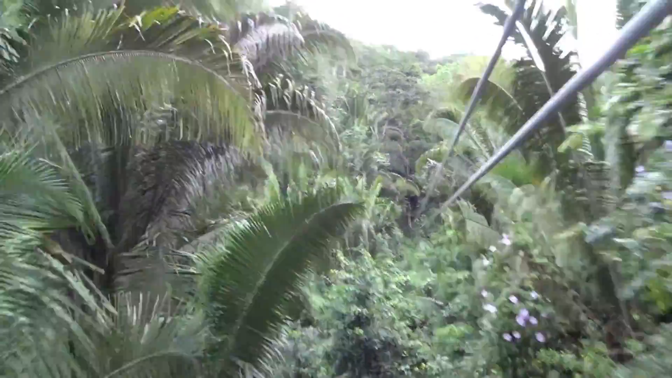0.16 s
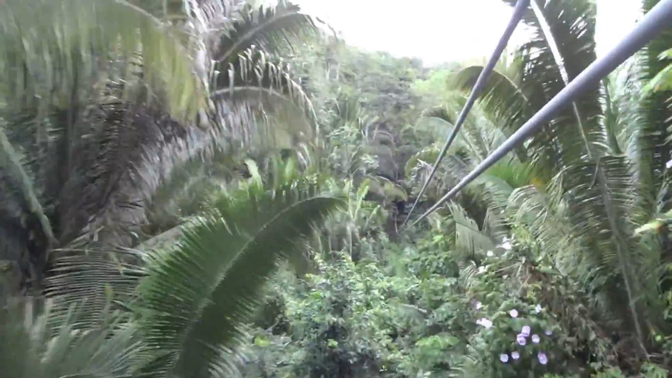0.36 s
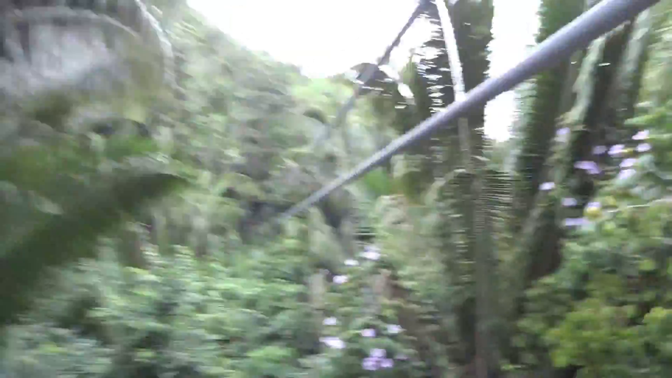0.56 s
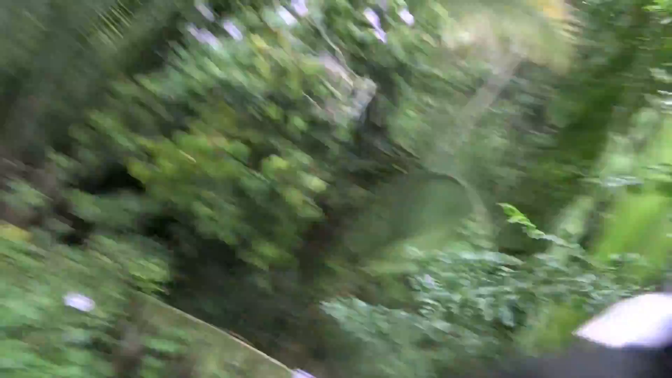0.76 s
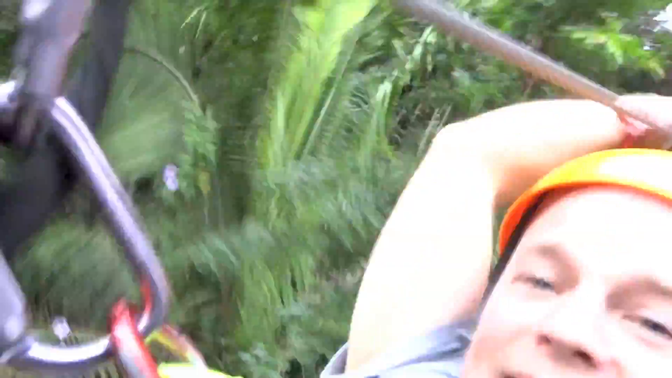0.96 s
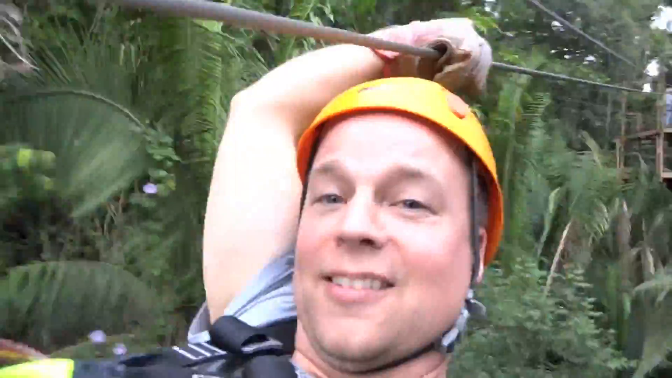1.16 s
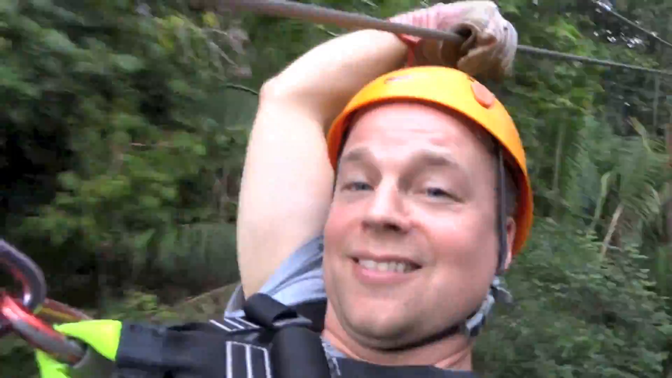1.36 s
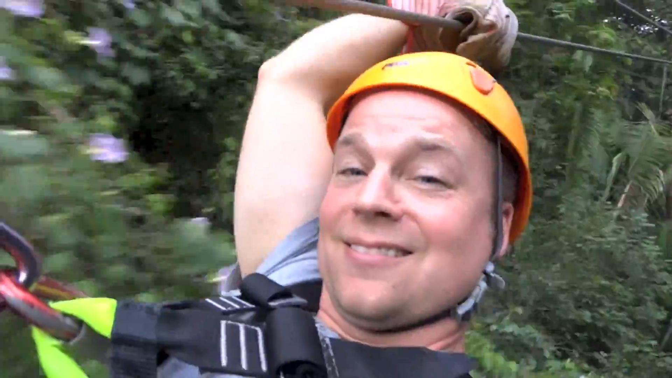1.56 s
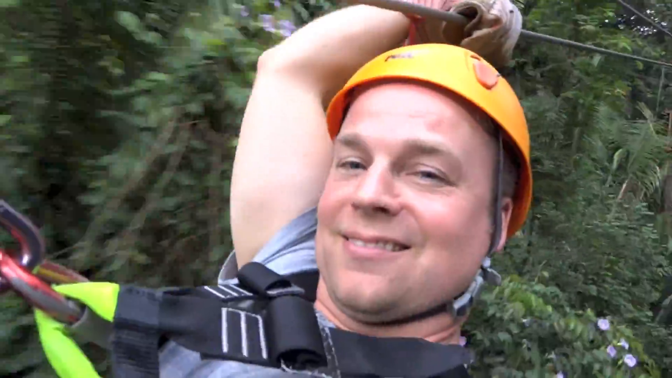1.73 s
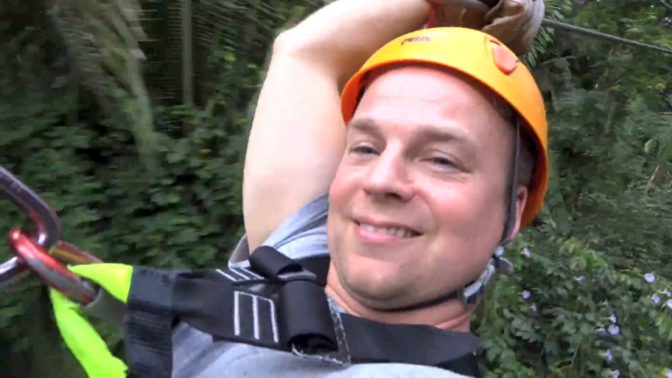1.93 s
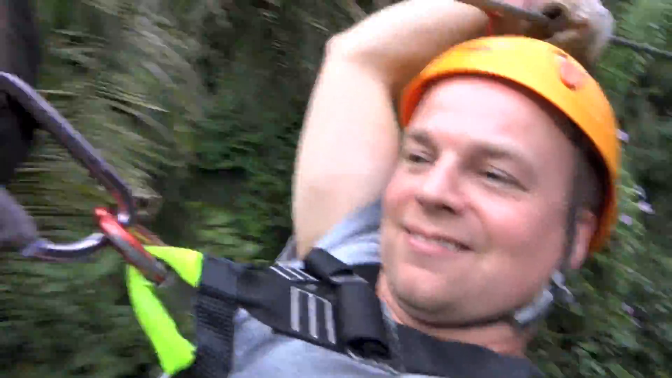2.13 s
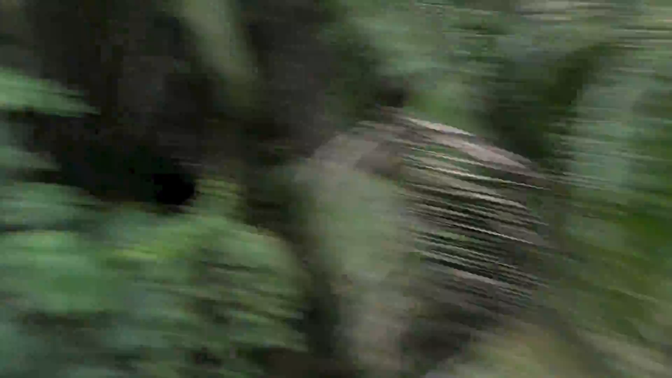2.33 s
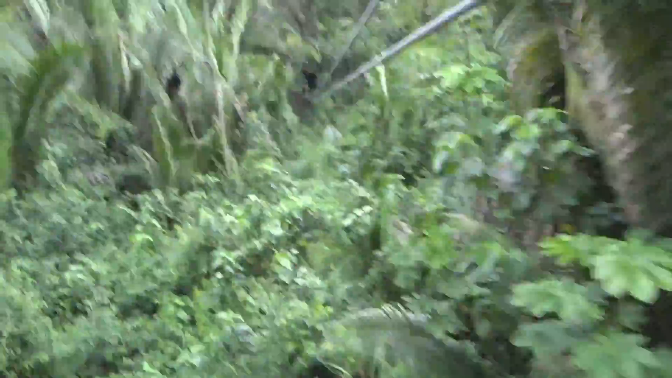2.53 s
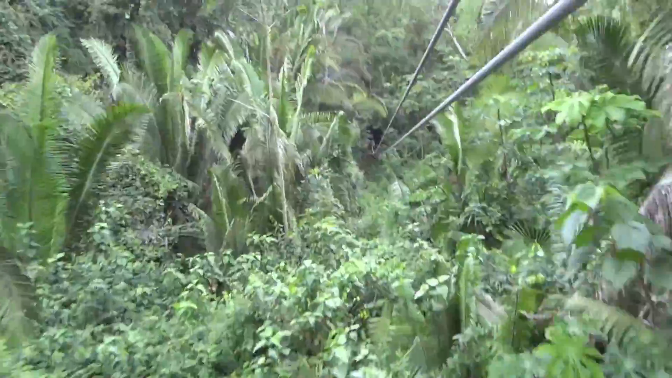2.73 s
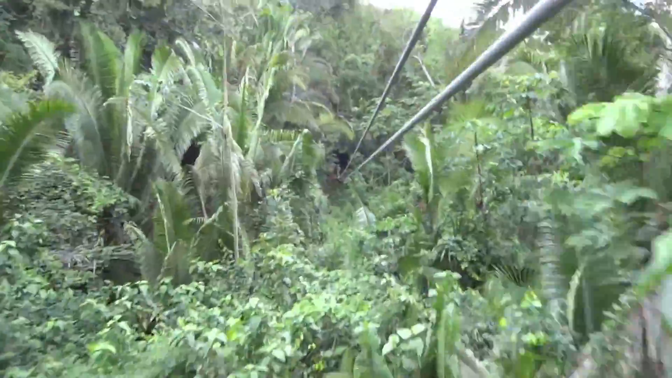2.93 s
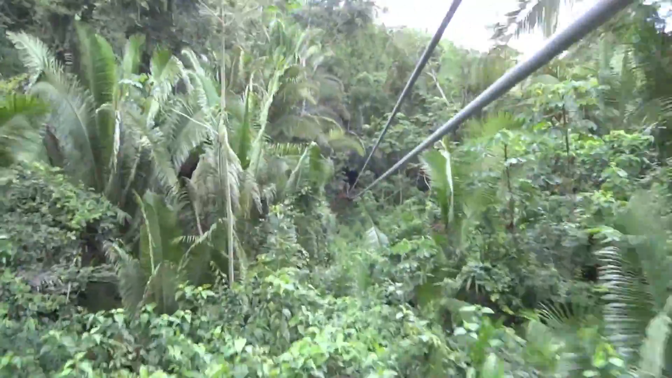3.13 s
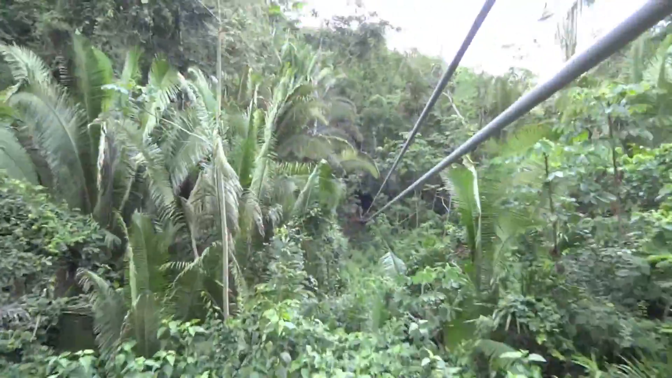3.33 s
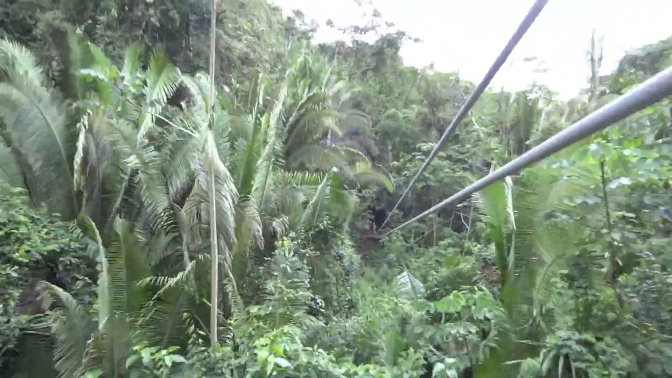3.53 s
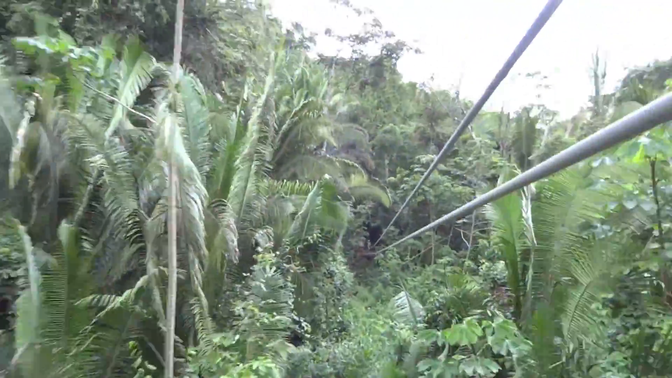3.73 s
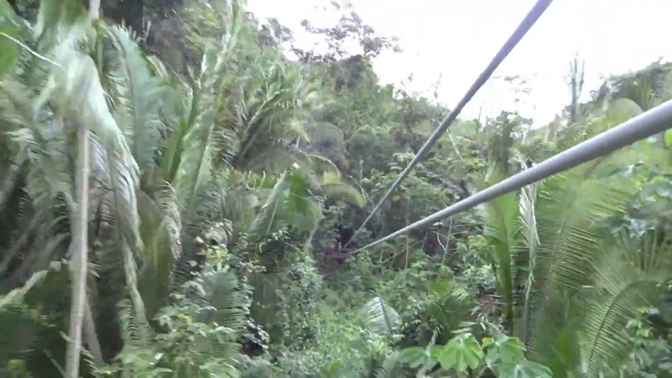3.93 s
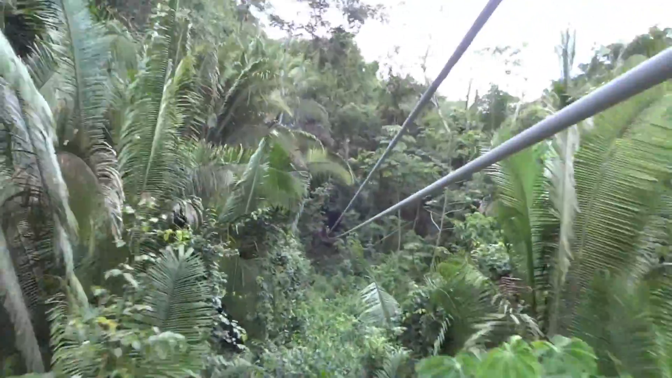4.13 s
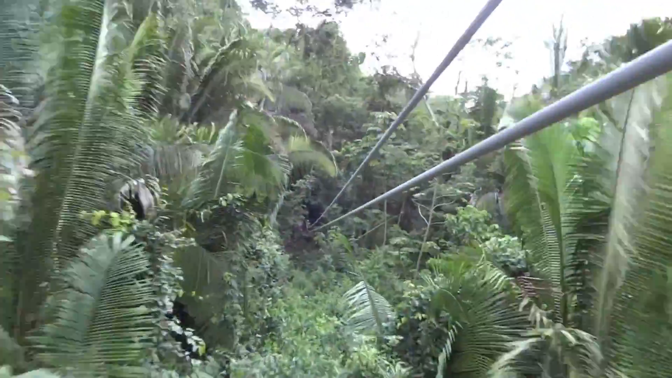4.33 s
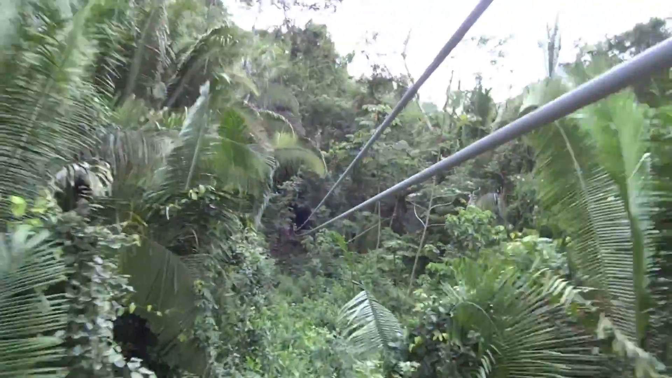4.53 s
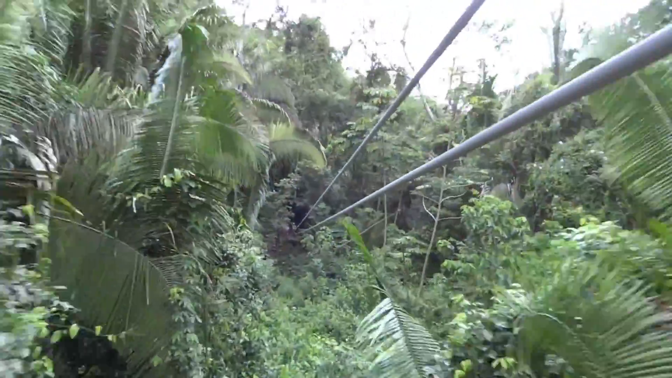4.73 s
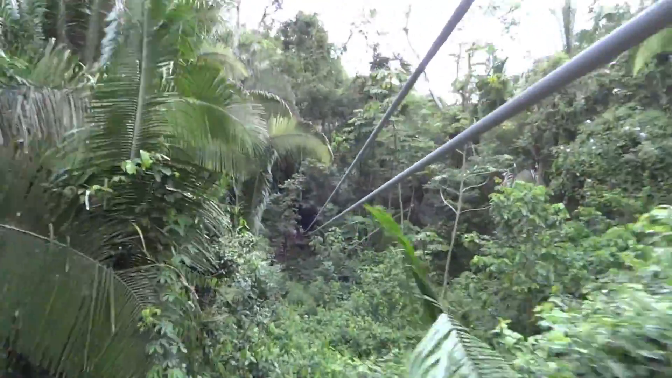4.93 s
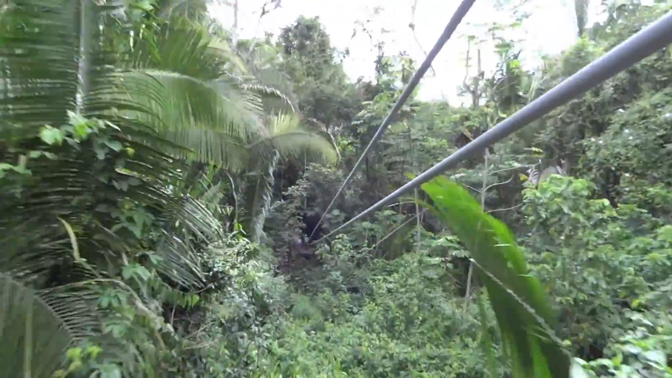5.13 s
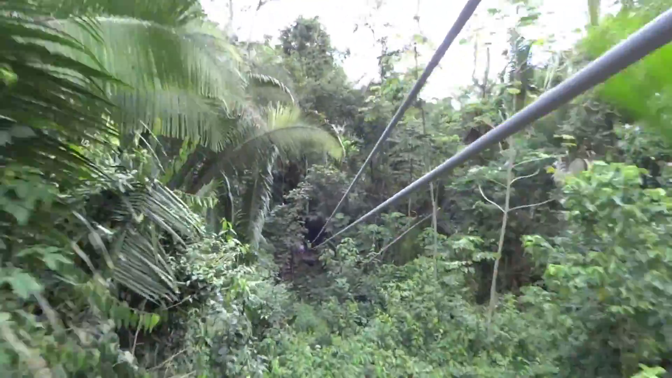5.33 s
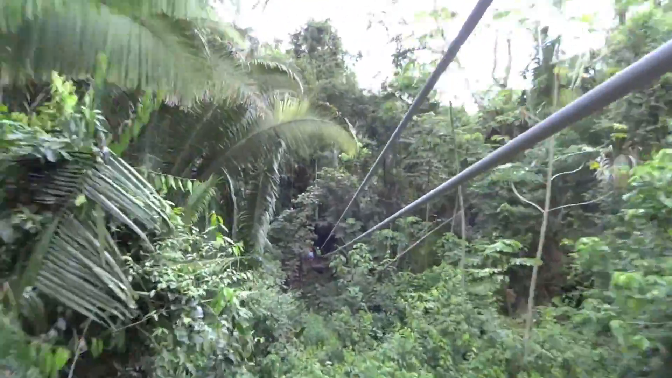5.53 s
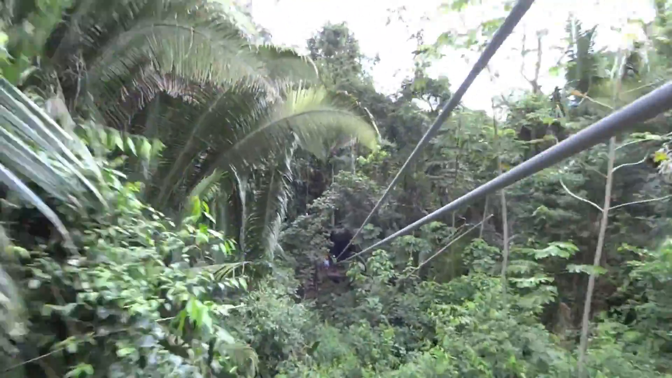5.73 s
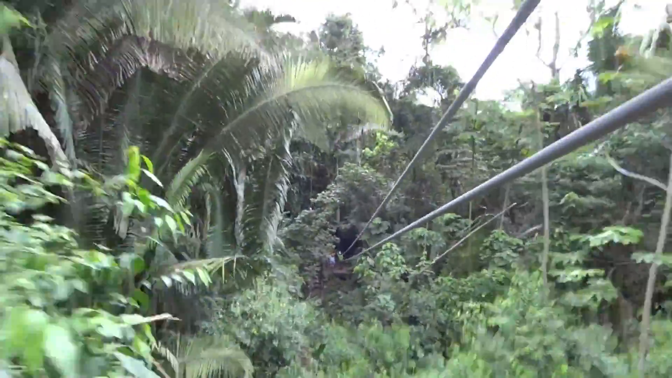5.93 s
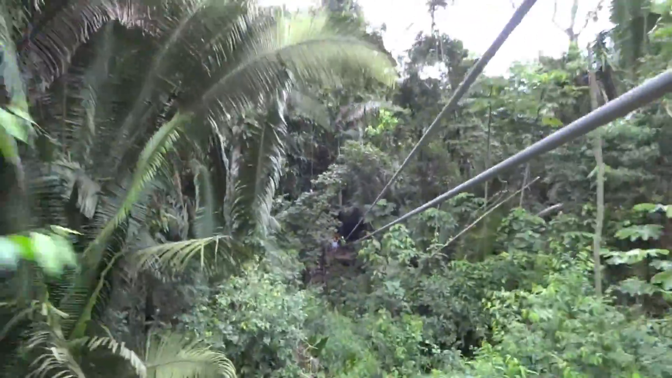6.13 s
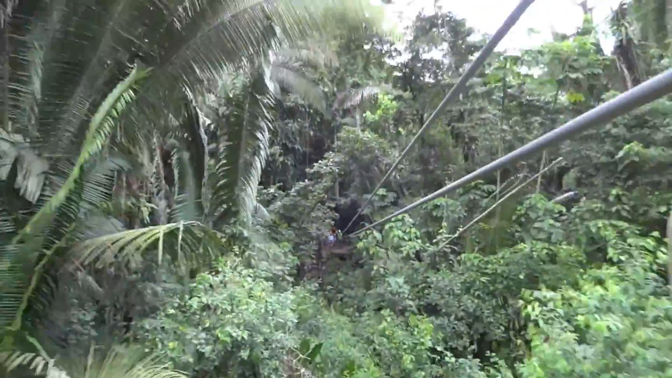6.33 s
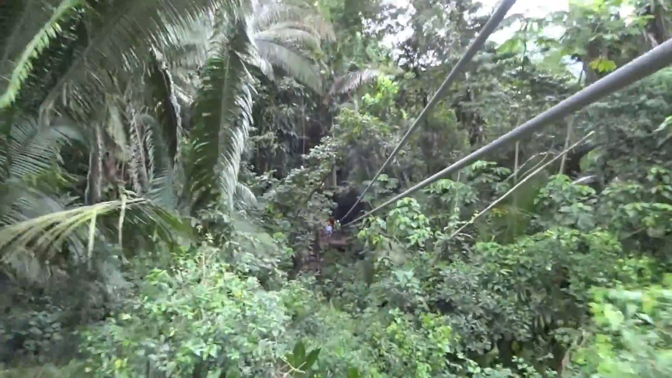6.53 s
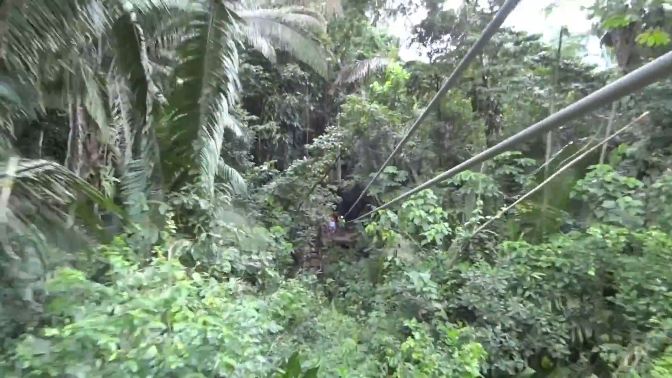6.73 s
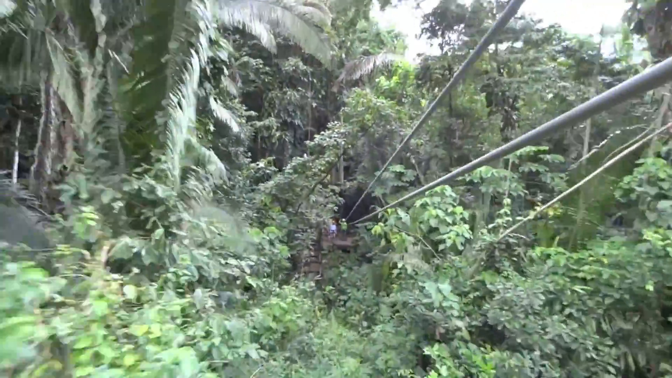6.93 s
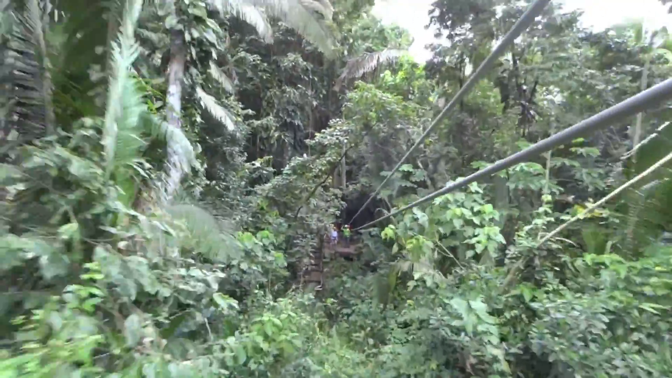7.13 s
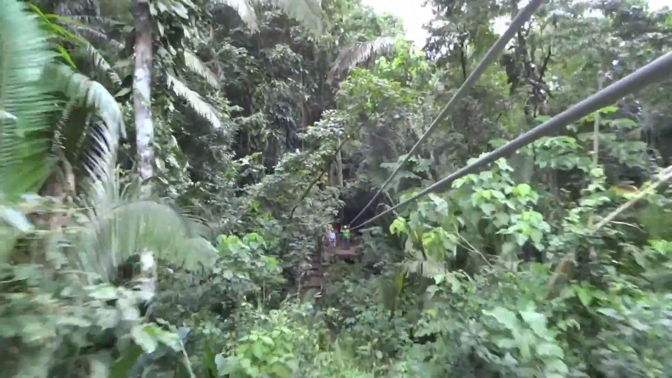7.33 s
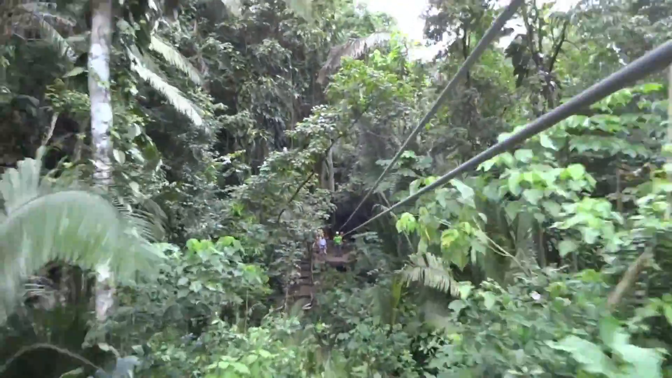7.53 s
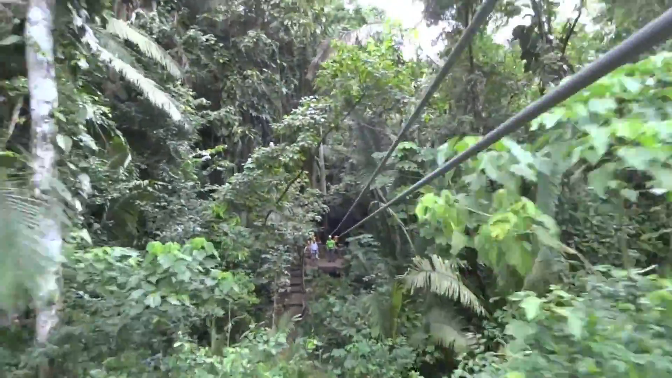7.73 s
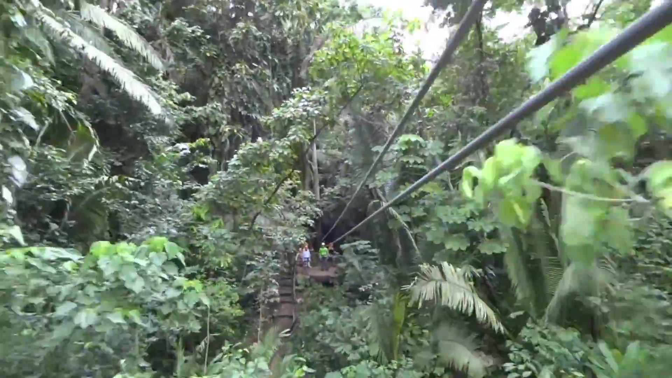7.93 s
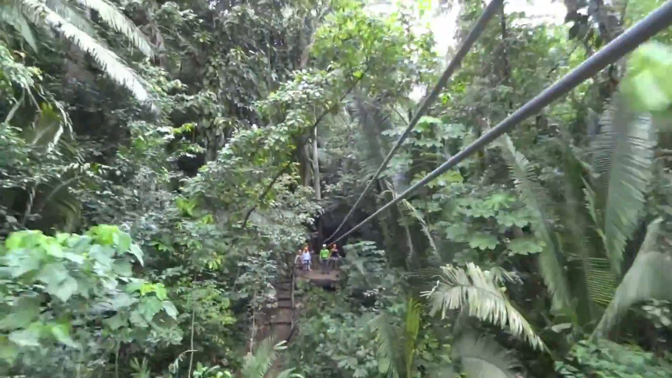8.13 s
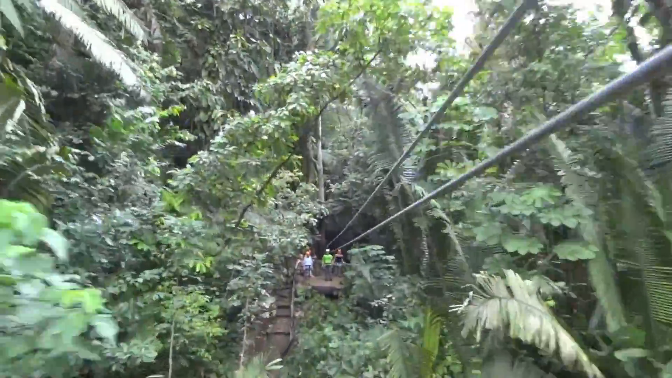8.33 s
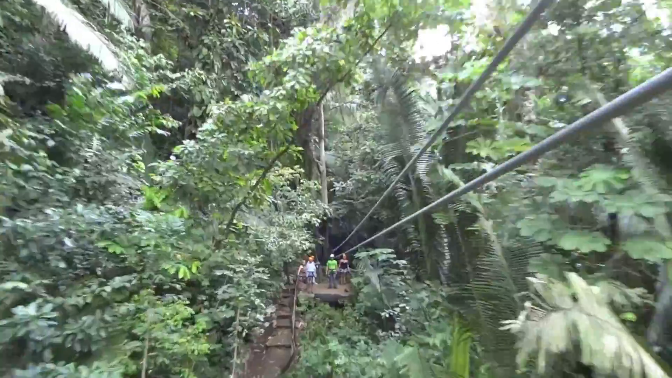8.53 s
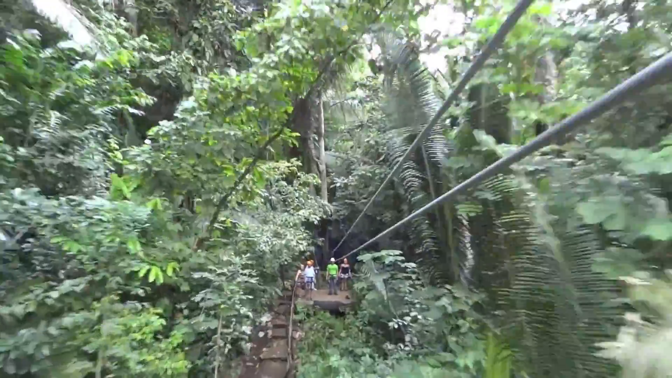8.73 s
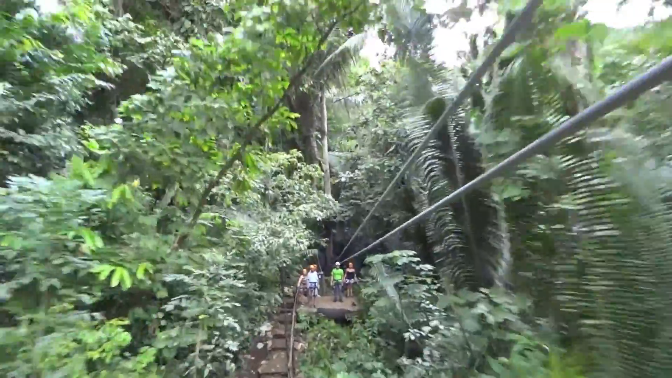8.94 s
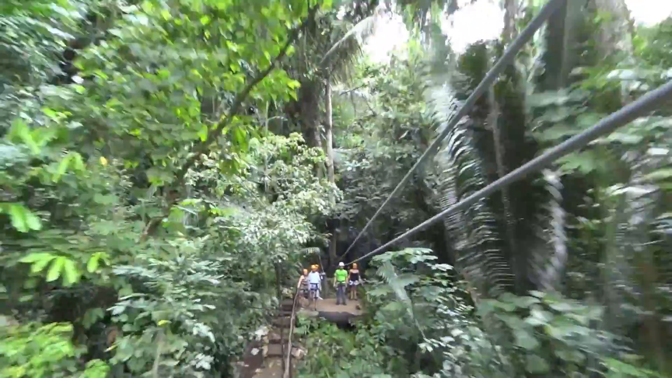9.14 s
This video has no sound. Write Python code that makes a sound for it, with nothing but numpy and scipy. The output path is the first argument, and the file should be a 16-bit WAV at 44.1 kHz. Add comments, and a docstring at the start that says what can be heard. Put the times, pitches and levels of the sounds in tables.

```python
"""A zip-line trolley runs along a steel cable through the forest, the microphone riding just below it.
Its whirr is a smeared tone: the twisted strands pass under the pulleys at an unsteady rate.
One pulley mode sings at a fixed high note, made by letting noise ring in a narrow band.
The contact hisses as grainy filtered noise. Wind buffets and rushes as low, wide filtered noise,
and drops while the microphone is turned back into the lee."""
import sys
import numpy as np
from scipy.fft import rfft, irfft, next_fast_len
from scipy.io import wavfile
from scipy.ndimage import uniform_filter1d

SR = 44100
rng = np.random.default_rng(int(sys.argv[2]) if len(sys.argv) > 2 else 0)


def int16_out(signal):
    """Quantize to a 16-bit WAV file."""
    q = np.round(np.clip(np.atleast_2d(signal).T, -1, 1) * 32767)
    wavfile.write(sys.argv[1], SR, q.astype(np.int16))


N = 408807
TIME = np.arange(N) / SR   # seconds
SIZE = next_fast_len(N)
BINS = np.maximum(np.arange(SIZE // 2 + 1) * SR / SIZE, 1)   # Hz

# The whirr starts dull, then opens up. Each row: time in seconds, centre of the whirr in Hz.
WHIRR_PITCH = [(0, 2598), (.28, 2700), (.39, 3230), (.47, 2886), (.56, 2460), (.63, 3160), (.68, 3750),
               (.74, 4596), (1.2, 4836), (2.5, 4842), (3.1, 4602), (5, 4672), (9.27, 4585)]
# How hard the pulleys bear on the cable; drives hiss, sizzle and whirr.
# Each row: time in seconds, level change in dB.
CONTACT = [(.75, -3.5), (1.15, 0.7), (2.3, -0.5), (2.8, -3.5), (3.5, -2), (4.1, 1), (4.75, -0.7),
           (5.75, 2.5), (6.15, -0.4), (6.85, -0.5), (7.3, -2), (7.95, 0.5), (8.3, -2), (9.27, -2)]
NOTE_HZ = 3682   # the pulley mode that sings


def from_db(db):
    """Turn decibels into gain."""
    return 10 ** (np.asarray(db) / 20)


def rms_one(x):
    """Scale a signal to unit power."""
    return x / np.sqrt(np.mean(x ** 2) + 1e-20)


def in_time(rows):
    """Draw each column of a table as a curve over all samples."""
    seconds, *columns = np.transpose(rows)
    return [np.interp(TIME, seconds, column) for column in columns]


def over_hz(points):
    """Draw a table of frequencies as a curve over all bins, on a logarithmic pitch scale."""
    hz, value = np.transpose(points)
    return np.interp(np.log(BINS), np.log(hz), value)


def swells(rows):
    """Bell-shaped rises or dips in dB, summed for each level column."""
    return sum(np.outer(db, np.exp(-((TIME - centre) / length) ** 2)) for centre, length, *db in rows)


def drift(rate):
    """A smooth random curve of unit power that changes about rate times a second."""
    spectrum = rfft(rng.standard_normal(SIZE))
    return rms_one(irfft(spectrum / (1 + (BINS / rate) ** 2), SIZE)[:N])


def white():
    """Two unrelated noises."""
    return rng.standard_normal((2, N))


def stereo(pair, colour_db, likeness, pan_db=0, lead=0):
    """Colour two unrelated signals and mix them into left and right; their mean has unit power."""
    mid, side = rfft(pair, SIZE) * from_db(colour_db)
    alike = np.clip(over_hz(likeness), -.995, .995)
    sign = np.array([[1], [-1]])   # left, right
    ears = np.sqrt(1 + alike) * mid + sign * np.sqrt(1 - alike) * side
    ears = ears * from_db(sign * pan_db / 2) * np.exp(.5j * sign * lead)
    out = irfft(ears, SIZE)[:, :N]
    return out / out.mean(axis=0).std()


def from_trolley(pair, colour_db):
    """Place a sound at the trolley, to the left: the sides differ in level and phase."""
    # Each row: frequency in Hz, correlation between left and right (1 is alike).
    likeness = [(1000, 1), (2500, 0.97), (3400, 0.91), (4200, 1), (5200, 0.81), (6200, 0.31), (8000, 0.12),
                (9800, 0.39), (11000, 0.6), (13000, 1)]
    # Each row: frequency in Hz, left minus right in dB.
    pan = [(1500, 1), (3600, 2), (4700, 4), (5700, 8), (6800, 8.5), (8200, 4), (9800, 2.5), (11000, 0)]
    # Each row: frequency in Hz, lead of the left side in radians.
    phase_lead = [(1500, 0.4), (3300, 0.25), (5200, 0.96), (6300, 2), (7300, 2.1), (9000, -2), (9900, 1.5),
                  (10700, -0.2), (13000, 0)]
    return stereo(pair, colour_db, likeness, over_hz(pan), over_hz(phase_lead))


def plate_lifts():
    """The side plates and pulleys resonate and lift some pitches, in dB at every bin."""
    # Resonances. Each row: frequency in Hz, width in Hz, lift in dB.
    plates = [(1916, 53, 3.5), (3270, 34, 6.5), (4785, 150, 3), (5260, 500, 4), (6650, 380, 1.5),
              (9790, 540, 6.5), (11670, 200, 5.5), (12300, 200, 7.5)]
    return sum(db / (1 + (2 * (BINS - hz) / width) ** 2) for hz, width, db in plates)


def turned():
    """How far the microphone has swung round to face the rider and the pulleys, 0-1."""
    # Each row: time in seconds, share of the turn from 0 to 1.
    turn = [(.88, 0.03), (1.26, 0.99), (2.15, 1), (2.37, 0.8), (2.45, 0.25)]
    return in_time(turn)[0]


def dullness():
    """Octaves by which the whirr lies below its open pitch."""
    pitch, = in_time(WHIRR_PITCH)
    open_hz = 4642
    return np.maximum(np.log2(open_hz / pitch), 0)


def strands(spread_hz, steepness, slack, widening):
    """The strands pass under a pulley at a very unsteady rate: a tone smeared into a whirr."""
    pitch, = in_time(WHIRR_PITCH)
    height = pitch / pitch.max()
    spectrum = rfft(white(), SIZE) / np.sqrt(1 + (BINS / spread_hz) ** steepness)
    scatter = rms_one(irfft(spectrum, SIZE)[:, :N])
    # a low whirr reads the scatter more slowly, so it is narrower
    position = np.cumsum(height ** widening)
    a, b = [np.interp(position, np.arange(N), part) for part in scatter]
    # a high whirr is more even in strength
    unsteady = (a + 1j * b) / (slack + a ** 2 + b ** 2) ** (height ** 2 / 2)
    carrier = np.exp(2j * np.pi * np.cumsum(pitch) / SR)
    return np.real(unsteady * carrier)


def whirr():
    """The strands shake the trolley, whose body and plates colour the sound; its strength is evened out."""
    # Broad response of the trolley. Each row: frequency in Hz, response in dB.
    body = [(600, -15), (1400, -4.5), (2200, -2.5), (3000, 1.5), (3600, 0), (4100, -2.5), (4600, -0.5),
            (5250, 1), (5600, -6.5), (6100, -9.5), (7200, -3.5), (8200, -19), (16000, -22)]
    pair = [strands(spread_hz=726, steepness=2.78, slack=0.11, widening=.3) for _ in range(2)]
    sound = from_trolley(pair, over_hz(body) + plate_lifts())
    power = uniform_filter1d(sound.mean(axis=0) ** 2, size=4410)   # over 0.1 s
    return sound / np.sqrt(power)


def singing(width_hz, skirt_hz, evenness):
    """Countless small knocks of the cable keep one pulley mode ringing: a fixed pitch, fluttering in strength."""
    detune = BINS - NOTE_HZ
    peak = 1 + (2 * detune / width_hz) ** 2
    skirt = 1 + (detune / skirt_hz) ** 4
    sound = from_trolley(white(), -10 * np.log10(peak * skirt))
    power = uniform_filter1d(sound.mean(axis=0) ** 2, size=3000)
    return rms_one(sound / power ** (evenness / 2))   # friction reins in the longer swells


def trolley():
    """The whirr follows the contact and yields to the note; both gain when the microphone faces the pulleys."""
    # Level of the singing note, heard facing forward. Each row: time in seconds, level in dB.
    note_level = [(0, -29), (.7, -24.5), (2.5, -25), (3, -30), (3.9, -29.5), (5.2, -26), (6.2, -21.5),
                  (7.2, -23.5), (8.4, -23), (9.27, -22)]
    # The note flares up. Each row: centre in seconds, length in seconds, rise in dB.
    note_surges = [(.39, .04, 5), (1.385, .02, 5), (2.19, 0.03, 3.5), (4.23, .03, 3.5), (4.63, 0.024, 6),
                   (4.74, .025, 6), (9.06, 0.024, 6)]
    # The whirr dips briefly. Each row: centre in seconds, length in seconds, change in dB.
    whirr_dips = [(2.37, 0.052, -1.5), (6.08, .07, -0.5)]
    turned_note_db, turned_whirr_db = 6.5, 0.7   # gain when fully turned
    contact_db, = in_time(CONTACT)
    pitch, = in_time(WHIRR_PITCH)

    note_db, = in_time(note_level) + swells(note_surges) + turned_note_db * turned()
    reach = np.minimum(pitch / NOTE_HZ, 1) ** 3   # a whirr below the mode excites it less
    note = reach * from_db(note_db) * singing(width_hz=66, skirt_hz=265, evenness=0.45)

    whirr_db = -19.0 + 0.3 * contact_db   # takes a share of the contact's swing
    whirr_db = whirr_db + turned_whirr_db * turned()
    whirr_db = whirr_db - 0.8 * dullness()   # softer while low and dull, in dB per octave
    whirr_db = whirr_db + swells(whirr_dips)[0]

    # the whirr loses power as the note swells
    yield_share, yield_s = 0.23, 0.0072   # share of the note's power; averaging time
    note_power = uniform_filter1d(note.mean(axis=0) ** 2, size=int(yield_s * SR) + 1)
    kept = 1 / np.sqrt(1 + yield_share * note_power / from_db(whirr_db) ** 2)
    waver_db = 0.43 * drift(4)   # the whirr wavers a little by chance
    return note + whirr() * kept * from_db(whirr_db + waver_db)


def contact_hiss(grain_db, grain_rate, swell_db):
    """Rough steel rolling on steel hisses in fine, uneven grains."""
    # Colour of the hiss. Each row: frequency in Hz, level in dB per Hz.
    hiss_colour = [(1000, -4), (2000, -4), (3500, 10), (6000, 0), (7000, -5.5), (8300, -2.5), (9200, 1),
                   (10400, 0), (11200, -1), (13200, -2), (14200, -9), (15700, 1)]
    # Thin sizzle at the very top. Each row: frequency in Hz, level in dB per Hz.
    sizzle_colour = [(9000, -50), (12000, -44), (13400, -10), (14300, 7), (15000, -1), (16000, -5.5)]
    # The sizzle swells before the whirr opens. Each row: centre in seconds, length in seconds, rise in dB.
    sizzle_swells = [(0.51, .17, 9)]
    contact_db, = in_time(CONTACT)
    sizzle_swell_db, = swells(sizzle_swells)
    hiss_db = -25.5 - 40 * dullness()   # a dull whirr shuts the hiss off, in dB per octave
    hiss = from_db(hiss_db) * from_trolley(white(), over_hz(hiss_colour) + plate_lifts())
    sizzle = from_db(-39 + sizzle_swell_db) * from_trolley(white(), over_hz(sizzle_colour))
    grains = rms_one(from_db(grain_db * drift(grain_rate) + swell_db * drift(10)))
    return from_db(contact_db) * (hiss + sizzle) * grains


def wind(lump_db, lump_rate, rumble_db):
    """Large eddies buffet both ports together; small ones rush past each separately. Both drop in the lee."""
    # Airflow outside the lee. Each row: time in seconds, buffeting in dB, rush in dB.
    airflow = [(0, -29, -41.5), (.5, -30, -36), (.8, -33.5, -35), (2.5, -26.5, -34), (2.9, -22, -31),
               (4.2, -23, -30.2), (5.5, -23, -29.5), (6.6, -23, -29.5), (8.2, -25.5, -31.5), (9, -25, -33),
               (9.27, -22.5, -31.5)]
    # Gusts. Each row: centre in seconds, length in seconds, change of buffeting in dB, of rush in dB.
    gusts = [(.22, 0.096, -2, 5.5), (.42, .045, 5.5, -2), (.89, 0.051, 4.5, -2), (2.425, 0.04, 9, 8.5),
             (2.9, 0.034, 2.5, -1), (3.02, 0.034, 2, 0.5), (3.6, .05, 2.5, 0), (5.16, 0.025, 3, 1.5),
             (6.02, 0.029, 2, 1.5)]
    # Colours of the buffeting, the rush and the steady rumble of the moving air.
    # Each row: frequency in Hz, level in dB per Hz.
    buffet_colour = [(15, -30), (30, -22), (55, -8), (100, -2), (170, 0.5), (300, 0.5), (450, -3),
                     (620, -6.5), (900, -24.5), (1600, -73)]
    rush_colour = [(100, -16), (250, -3), (500, -1.5), (780, 0.5), (1050, -3.5), (1500, -9), (2500, -11),
                   (5000, -13.5), (9000, -35)]
    rumble_colour = [(15, -20), (35, -10), (65, -0.5), (120, 1.5), (200, -6), (400, -23), (1000, -62)]
    # Each row: frequency in Hz, correlation between left and right (1 is alike).
    likeness = [(57, 0.98), (113, 0.99), (226, 0.92), (450, 0.67), (900, 0.25), (1800, -.1)]
    # The angle of the microphone to the airflow sets how wide the wind is.
    # Each row: time in seconds, gain of the left-right difference in dB.
    wind_width = [(0, -18), (.62, -11), (.8, 5), (1.2, 10), (2.2, 8), (2.6, 3.5), (9.27, 3)]
    lee_db = [-19, -5]   # change of buffeting and rush when fully turned
    buffet_db, rush_db = in_time(airflow) + swells(gusts) + np.outer(lee_db, turned())
    width_db, = in_time(wind_width)
    buffet = from_db(buffet_db) * stereo(white(), over_hz(buffet_colour), likeness)
    rush = from_db(rush_db) * stereo(white(), over_hz(rush_colour), likeness, pan_db=-0.5)
    rumble = from_db(rumble_db) * stereo(white(), over_hz(rumble_colour), likeness)
    lumps = from_db(lump_db * drift(lump_rate))
    air = (buffet + rush) * lumps + rumble
    middle = air.mean(axis=0)
    return middle + from_db(width_db) * (air - middle)


def scene():
    """Whirr and singing note of the trolley, with hiss and wind around them."""
    hiss = contact_hiss(grain_db=0.76, grain_rate=140, swell_db=0.44)
    air = wind(lump_db=1.38, lump_rate=77, rumble_db=-42.5)
    return trolley() + hiss + air


def record(dry):
    """Cut the top off steeply."""
    cutoff_hz = 15750
    return irfft(rfft(dry, SIZE) / np.sqrt(1 + (BINS / cutoff_hz) ** 600), SIZE)[:, :N]


dry = scene()
out = record(dry)
int16_out(out)
```